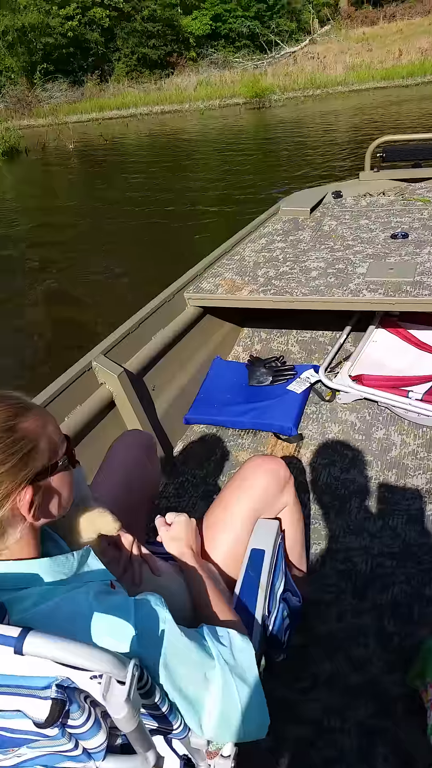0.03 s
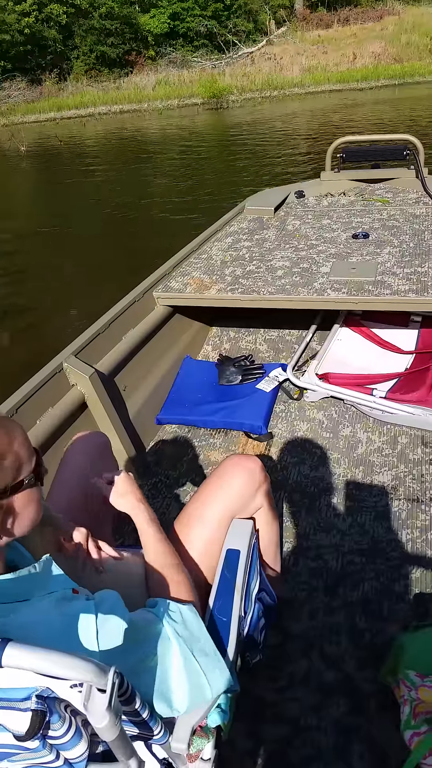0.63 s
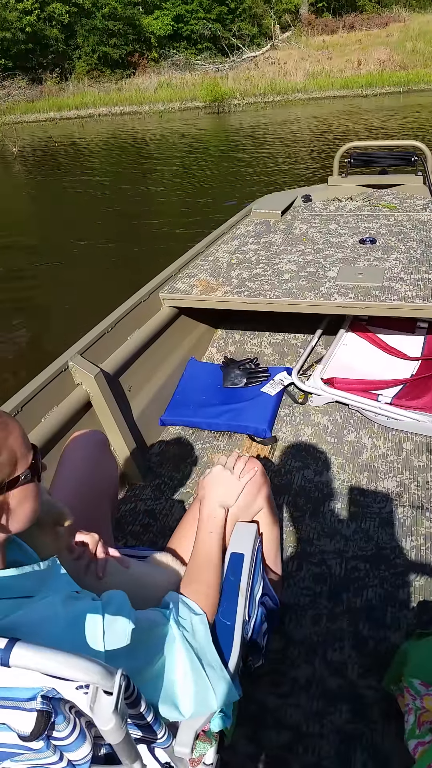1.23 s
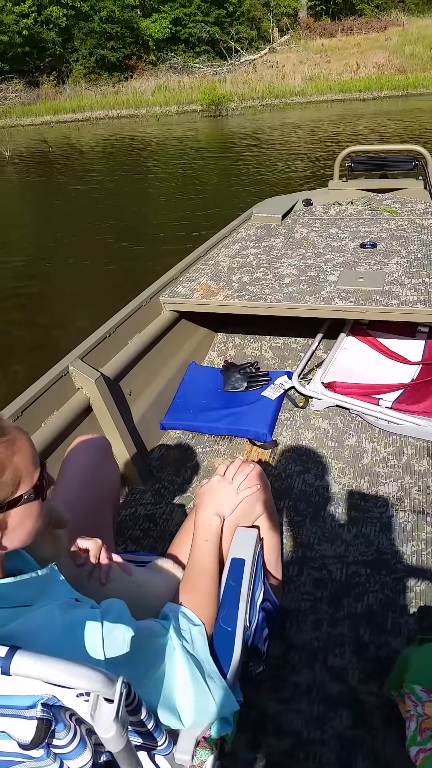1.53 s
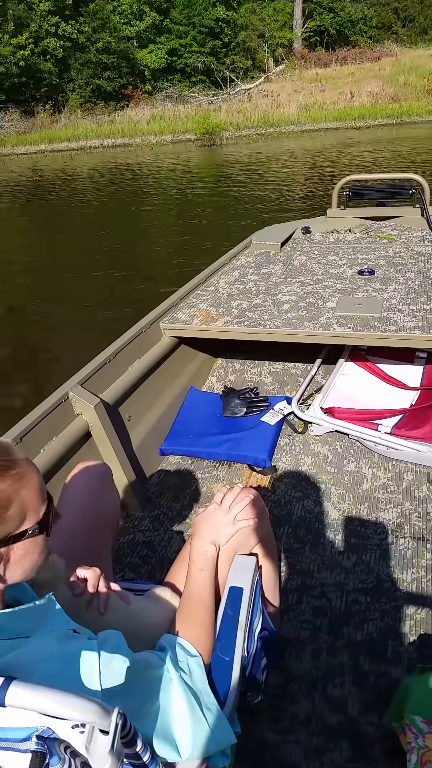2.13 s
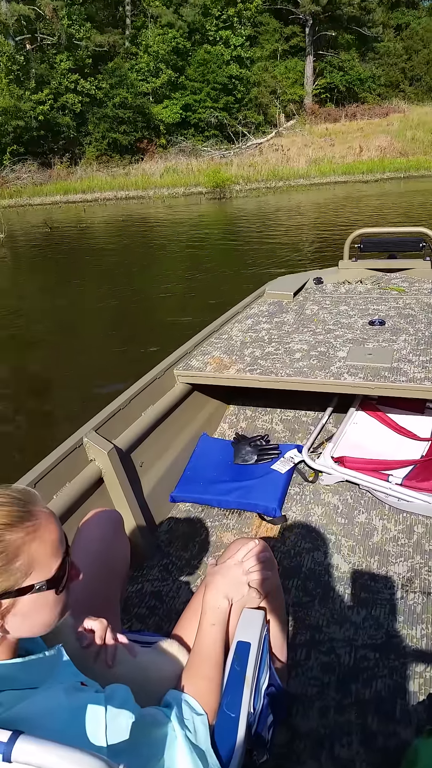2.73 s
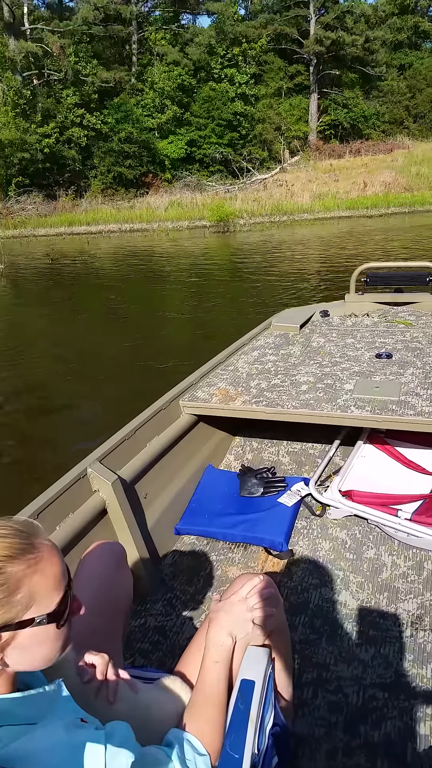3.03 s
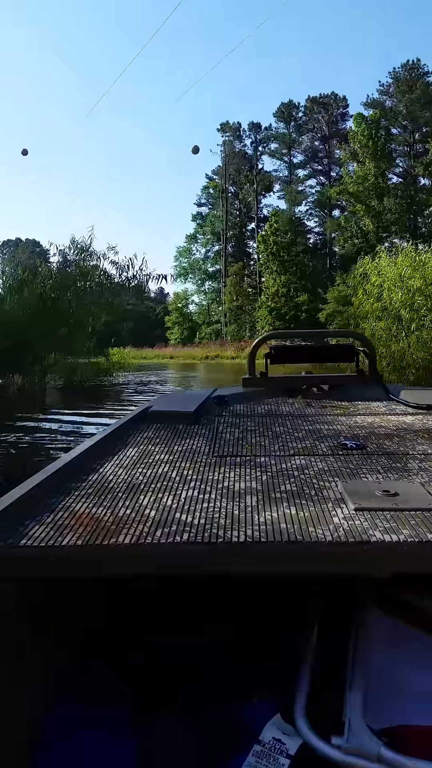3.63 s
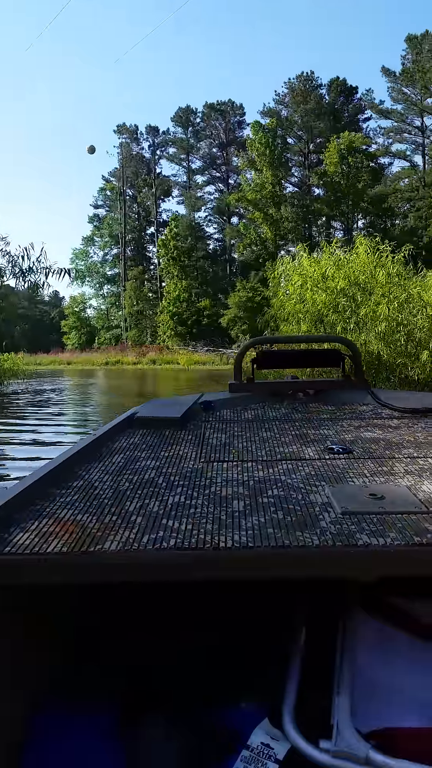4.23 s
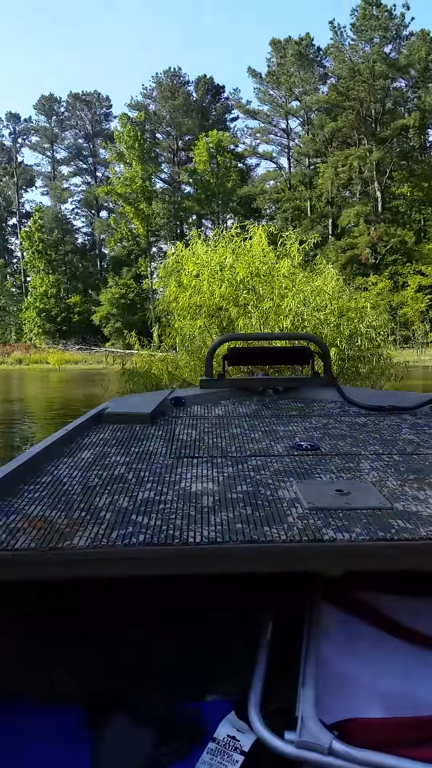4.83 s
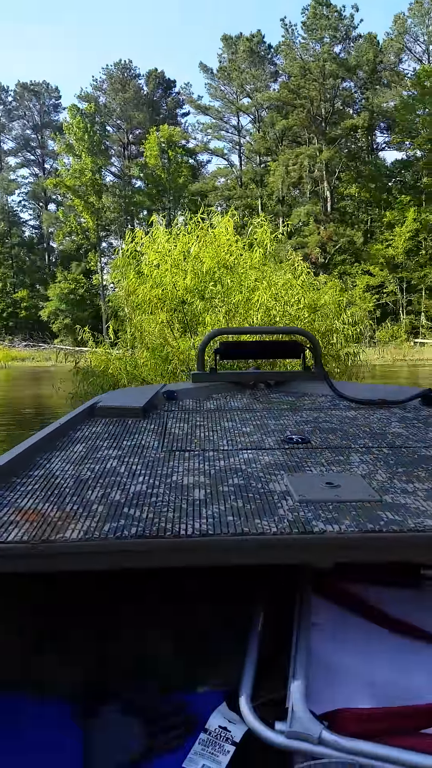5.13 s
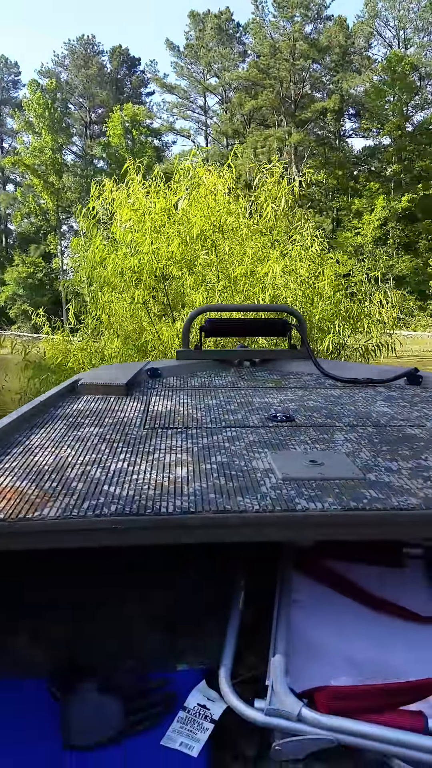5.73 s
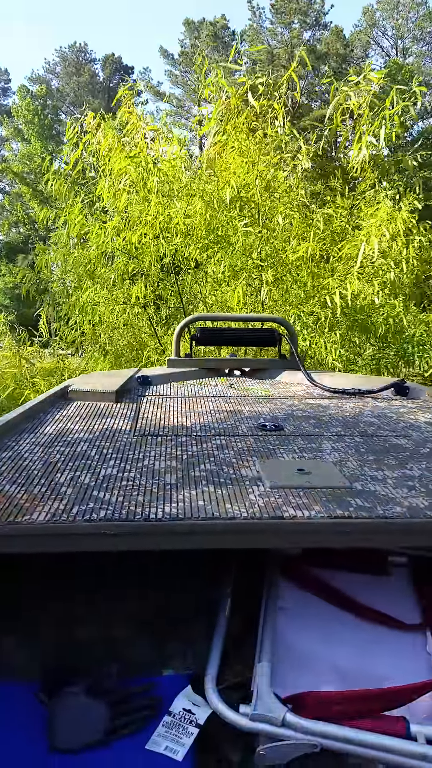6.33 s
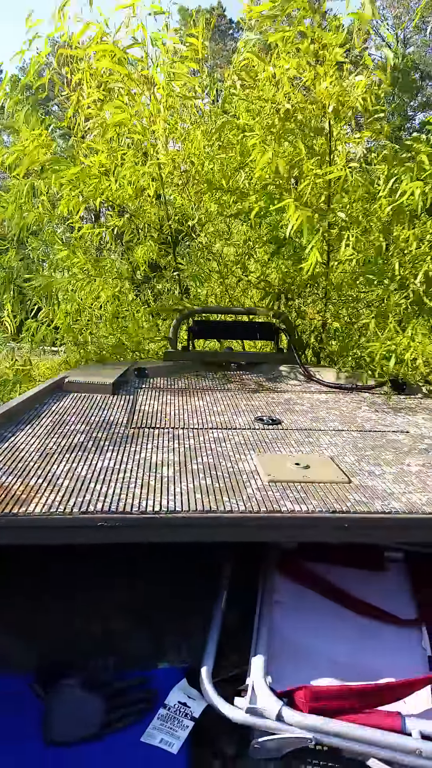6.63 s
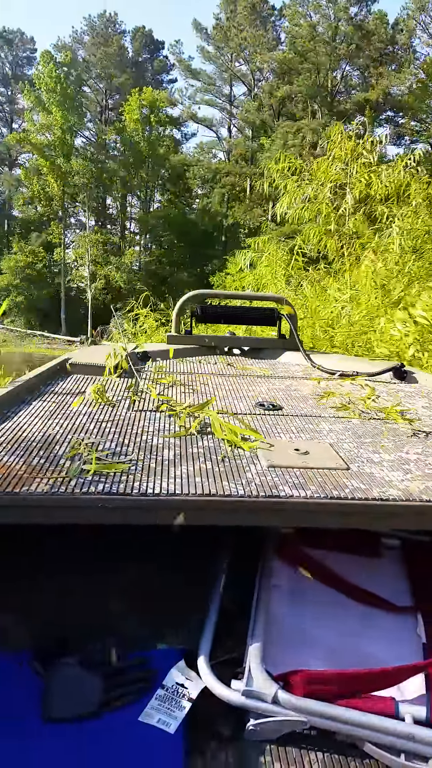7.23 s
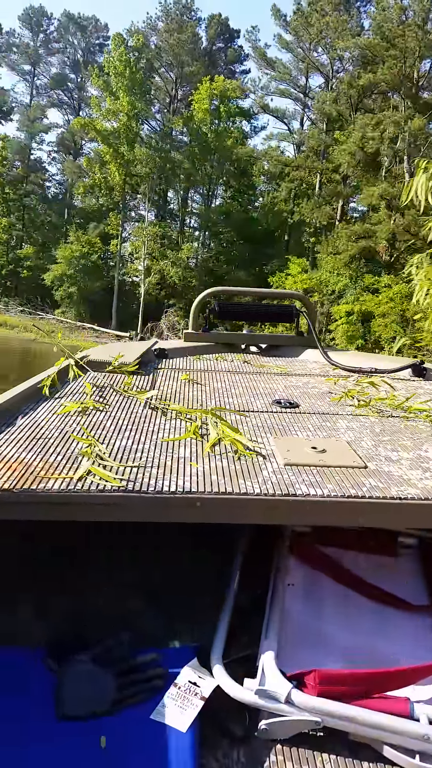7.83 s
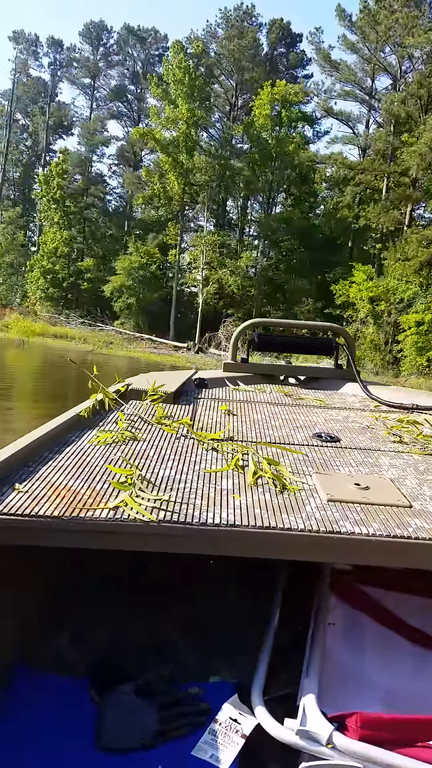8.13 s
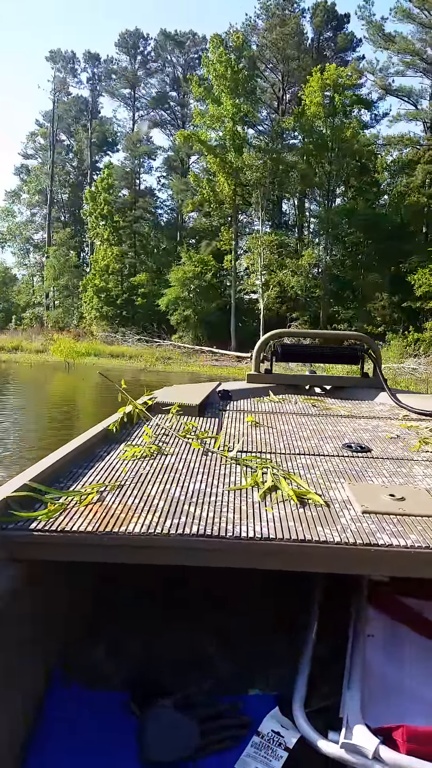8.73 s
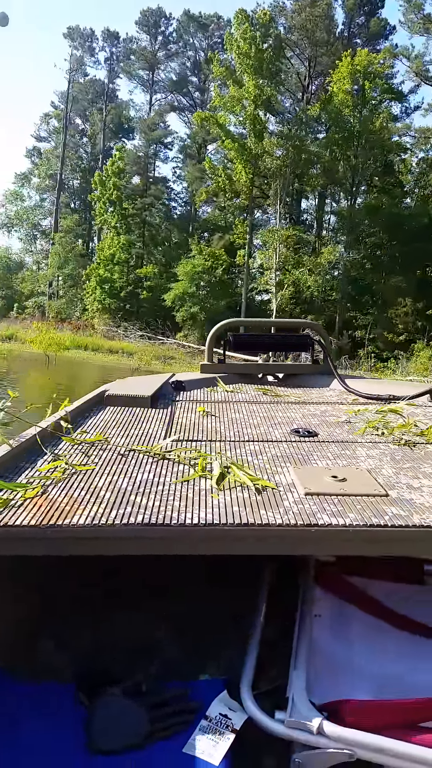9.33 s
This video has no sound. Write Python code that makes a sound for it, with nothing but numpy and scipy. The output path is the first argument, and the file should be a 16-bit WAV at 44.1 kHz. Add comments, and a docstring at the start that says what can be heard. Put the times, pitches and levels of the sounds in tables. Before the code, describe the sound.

Heard on board, a boat engine chugs unevenly, drops to idle, then climbs to full power amid wind, spray and snapping twigs.

```python
"""A V-twin mud motor chugs at a trot, heard from on board a flat metal boat on a lake.
After a click, from lower in the hull, it idles, revs up and pushes the boat through a willow bush.
Uneven pairs of firings ring the exhaust and shake the hull; valves hiss, a loose panel buzzes,
a fitting jingles, water fizzes, wind rumbles and twigs snap.
In the run, engine speed sets the motor's levels; load is (speed / full speed) squared."""
import sys
import numpy as np
from scipy import signal
from scipy.fft import rfft, irfft
from scipy.io import wavfile
from scipy.ndimage import uniform_filter1d

SR = 44100
rng = np.random.default_rng(int(sys.argv[2]) if len(sys.argv) > 2 else 0)


def unload_wav(signal):
    """Save mono or channel-first audio to the path in sys.argv[1] as 16-bit WAV at rate SR, clipped to [-1, 1]."""
    wavfile.write(
        sys.argv[1],
        SR,
        np.round(np.clip(np.atleast_2d(signal).T, -1, 1) * 32767).astype(np.int16),
    )


N = 422037
TIME_S = np.arange(N) / SR
RUN_START_S = 3.459
FULL_SPEED_HZ = 30.5  # engine speeds count four-stroke cycles


def undb(db):
    """Decibels to gain."""
    return 10 ** (np.asarray(db) / 20)


def curve(points):
    """(t/s, value) points to one value a sample."""
    return np.interp(TIME_S, *np.transpose(points))


def unit(x):
    """Scale to rms 1."""
    return x / np.sqrt(np.mean(x ** 2))


def steady(x, size=24000):
    """Even out the slow level, keeping single beats."""
    power = np.mean(np.atleast_2d(x) ** 2, axis=0)
    power = uniform_filter1d(uniform_filter1d(power, size // 2), size // 2)
    return x / np.sqrt(np.maximum(power, 0) + 1e-12)


def ring(x, response):
    """Play x through an impulse response."""
    return signal.fftconvolve(np.atleast_2d(x), np.atleast_2d(response))[:, :N]


def colour(x, points, size=16384):
    """Minimum-phase filter through (f/Hz, gain/dB) points."""
    hz, db = np.transpose(points)
    log_hz = np.log(np.fft.rfftfreq(size, 1 / SR) + 1)
    log_gain = np.log(undb(np.interp(log_hz, np.log(hz), db)))
    causal = np.r_[1, np.full(size // 2 - 1, 2), np.zeros(size // 2)]
    cepstrum = irfft(log_gain) * causal
    return ring(x, irfft(np.exp(rfft(cepstrum))))


def modes(x, rows):
    """Sum of resonances (f/Hz, width/Hz, gain/dB)."""
    return sum(undb(db) * signal.lfilter(*signal.iirpeak(hz, hz / width_hz, fs=SR), x)
               for hz, width_hz, db in rows)


def noise(alike, size=N):
    """Stereo white noise with correlation alike."""
    white = rng.standard_normal((3, size))
    return np.sqrt(alike) * white[2] + np.sqrt(1 - alike) * white[:2]


def walk(rate_hz):
    """Slow random wander of rms 1."""
    hold = int(SR / rate_hz)
    steps = np.repeat(rng.standard_normal(N // hold + 1), hold)
    return unit(uniform_filter1d(steps, hold)[:N])


def beats(cycle, strokes, scatter_db, jitter_s):
    """One pulse a cycle per stroke (phase/cycles, level/dB), each a little different."""
    out, count = np.zeros(N + 2), 400
    for phase, db in strokes:
        at = np.interp(np.arange(count) + phase, cycle, np.arange(N), left=-N, right=-N)
        timing, strength = rng.standard_normal((count, 2)).T
        at = at + jitter_s * SR * timing
        inside = (at >= 0) & (at < N)
        gain = undb(db + scatter_db * strength)[inside]
        i, fraction = at[inside].astype(int), at[inside] % 1
        out[i] += gain * (1 - fraction)
        out[i + 1] += gain * fraction
    return out[:N]


def fade(t60_s, size=16384):
    """Exponential decay."""
    return undb(-60 * np.arange(size) / SR / t60_s)


def puffs(pulses, t60_s, alike, rise_samples=150):
    """Each pulse releases a noise burst that swells and dies."""
    return uniform_filter1d(ring(pulses, fade(t60_s)), rise_samples) * noise(alike)


def stereo(x, balance, lag_samples):
    """Split each band's power by balance (f/Hz, left minus right/dB); the left side lags."""
    hz, db = np.transpose(balance)
    right_db = 10 * np.log10(2 / (1 + undb(db) ** 2))
    left = colour(np.roll(x[0], lag_samples), np.c_[hz, right_db + db])
    right = colour(x[1], np.c_[hz, right_db])
    return np.vstack([left, right])


def hull(pulses, t60_s, alike):
    """Every blow excites the same dense plate modes, so the clatter repeats with the engine."""
    tail = fade(t60_s)
    return ring(pulses, tail * noise(alike, len(tail)))


def trot():
    """Paired exhaust thuds about 270 degrees apart, weaker gulps between; valves knock and hiss."""
    # engine speed: t/s, speed/Hz
    speed_points = [(0.36, 11.594), (1.05, 11.826), (1.5, 11.632), (1.85, 11.809), (2.4, 12.264),
                    (3.46, 11.995)]
    # exhaust, clatter and valve spectra: f/Hz, level/dB
    pipe_spectrum = [(20, -74), (38, -22), (60, -3), (92, 2), (150, 7), (195, 1.5), (250, -3.5),
                     (285, -21.5), (400, -23.5), (520, -46.5), (1200, -106.5)]
    clatter_spectrum = [(100, 4), (260, -14), (380, 4), (500, -3.5), (750, 0), (1000, -4), (1550, -3.5),
                        (2100, -13), (3000, -17.5), (5000, -23), (12000, -24)]
    hiss_spectrum = [(1200, -5), (2400, -5.5), (3400, -4), (4500, 1), (5400, -9), (7500, -9), (8400, -10),
                     (9200, 3), (10000, 3), (12400, -1), (14000, -12), (15600, -23)]
    # stereo balance: f/Hz, left minus right/dB
    balance = [(100, -.5), (700, 1.5), (1300, 0), (2400, 1), (4000, 3.5), (5300, 12), (7500, 9), (8400, 0),
               (9400, -14), (12400, -14), (15000, -6)]
    start_s, swell_s = .38, .33
    cycle = np.cumsum(curve(speed_points) * (TIME_S > .36)) / SR
    firings = beats(cycle, [(.253, 0), (.632, 0)], scatter_db=.56, jitter_s=.00011)
    gulps = beats(cycle, [(.505, -11), (.882, -8.5)], scatter_db=-1.5, jitter_s=.00047)
    exhaust = unit(colour(-(firings + gulps), pipe_spectrum)) * undb(-12.5)
    valves = beats(cycle, [(.265, -13), (.6, -11), (.92, -5.5)], scatter_db=1.5, jitter_s=.000489)
    knocks = .64 * unit(hull(valves + .22 * firings, t60_s=.24, alike=.85))
    rasp = .6 * unit(puffs(valves, t60_s=.19, alike=.87)) + .7 * noise(.86)
    clatter = unit(colour(knocks + rasp, clatter_spectrum)) * undb(-28)
    air = unit(puffs(valves, t60_s=.06, alike=.05, rise_samples=240)) + .31 * noise(0)
    hiss = unit(colour(air, hiss_spectrum)) * undb(-38)
    swell = (1 - 1.075 * np.exp(-np.maximum(TIME_S - start_s, 0) / swell_s)) * (TIME_S > start_s)
    return stereo((exhaust + clatter + hiss) * swell, balance, lag_samples=14)


def click():
    """One dry click as the listening spot changes."""
    pulse = np.zeros(N)
    pulse[int(RUN_START_S * SR)] = 1
    return colour(pulse, [(100, 12), (500, 20), (1500, 11.5), (5000, 2), (15000, -15)])


def engine(cycle, speed_hz, load, overrun):
    """The pipe booms at idle and barks under load; the hull clatters and drones on a low mode."""
    # exhaust and hull spectra: f/Hz, level/dB
    boom_spectrum = [(20, -28.5), (40, -26), (62, -4.5), (80, -7.5), (100, -10.5), (118, 0), (133, 4),
                     (155, -2.5), (180, -13), (225, -13), (265, -35.5), (400, -37.5), (900, -60.5)]
    bark_spectrum = [(40, -46), (90, -22.5), (150, -17.5), (200, -2), (245, -11), (290, 4), (345, -10),
                     (420, -17.5), (520, -30), (620, -26.5), (1000, -45.5), (3000, -78)]
    idle_spectrum = [(100, -6), (280, -7.5), (400, -1.5), (570, 4), (720, -3.5), (1050, -27.5),
                     (1500, -8.5), (2000, -17.5), (3000, -17.5), (3800, -28.5), (6000, -32), (12000, -43)]
    loaded_spectrum = [(100, -9.5), (280, 6), (400, 1.5), (610, -0.5), (770, -7.5), (1100, -13.5),
                       (1500, -12), (2000, -14.5), (2500, -12.5), (3300, -32.5), (6000, -30.5),
                       (12000, -65)]
    slack = 1 - load
    racing = np.interp(speed_hz, [22, FULL_SPEED_HZ], [0, 1])  # boom and bark give way to tones
    throttle = undb(np.interp(speed_hz, [6.6, 13.7], [-13.5, 0]))  # firings hit harder as it opens
    firings = beats(cycle, [(.885, 0), (.265, 0)], scatter_db=.5, jitter_s=.00024)
    boom = unit(colour(-firings, boom_spectrum)) * undb(-14 + 4 * slack - 11.5 * racing)
    low_mode = modes(modes(firings, [(76, 7.7, 0)]), [(77.2, 43, 0)])
    drone = throttle * unit(low_mode) * undb(-22.5 + 9 * slack)
    barks = beats(cycle, [(.885, 0), (.281, -1.2)], scatter_db=2.5, jitter_s=.00031)
    bark_db = -17.5 - 8 * slack - 6.5 * racing + 4 * overrun
    bark = throttle * steady(colour(barks, bark_spectrum)) * undb(bark_db)
    strokes = [(.94, -1), (.15, -3), (.35, .5), (.55, 1.5), (.73, .8)]
    blows = beats(cycle, strokes, scatter_db=2.84, jitter_s=.00006)
    knocks = .85 * steady(hull(blows, t60_s=.22, alike=.53))
    rasp = .8 * steady(puffs(blows, t60_s=.08, alike=.77)) + .5 * noise(.34)
    idle = unit(colour(knocks + rasp, idle_spectrum))
    loaded = unit(colour(knocks + rasp, loaded_spectrum))
    fullness = np.clip(3 * load, 0, 1)  # under load the whole hull joins in
    clatter = ((1 - fullness) * idle + fullness * loaded) * undb(-20 - 13 * slack)
    return boom + drone + bark + clatter


def tones(cycle, speed_hz):
    """Shaft and pipe tones grow with speed; each swells as it crosses a higher hull mode."""
    # engine harmonics: f/cycle rate
    orders = [2, 3, 5, 6, 7, 8, 10, 12, 14, 16, 17, 19, 20, 22, 24, 32, 36, 40, 44]
    # their strengths: level/dB
    levels_db = [3.5, -14, -6.5, -4, -6.5, -8, -5, -14.5, -22, -37, -14, -19.5, -15, -19, -20.5, -21.5,
                 -20.5, -21.5, -31]
    mode_hz, half_width_hz, peak_db = 198.4, 7.4, 10.5
    full_speed_db, db_per_octave = -17, 27.5
    chord = 0
    for order, db in zip(orders, levels_db):
        lift_db = peak_db / (1 + ((order * speed_hz - mode_hz) / half_width_hz) ** 2)
        tone = np.sin(2 * np.pi * order * (cycle + order / 7))
        chord = chord + tone * undb(db + lift_db + 1.5 * walk(4))
    return chord * undb(full_speed_db + db_per_octave * np.log2(speed_hz / FULL_SPEED_HZ))


def panel(cycle, speed_hz):
    """A loose panel slaps twice a cycle, at times hard; it dies away as the bow meets the bush."""
    # extra single slaps, some much harder than the regular ones: t/s, level re a regular slap/dB
    extra_slaps = [(3.685, 19), (4.344, 7.5), (4.44, 3), (5.004, -1), (5.076, -2), (5.482, 3)]
    # soft contact spectrum: f/Hz, level/dB
    contact = [(2400, 0), (3400, -10), (6000, -16)]
    # panel modes before and after the rev-up: f/Hz, width/Hz, level/dB
    slow_modes = [(564, 61, -14), (1442, 44, 6), (1640, 59, -11), (2140, 37, -4.5)]
    fast_modes = [(1257, 40, 1.5), (1660, 57, 8.5), (2070, 76, 4.5), (2350, 59, -20)]
    full_shake_hz, db_per_octave = 14.8, 10.5
    fade_start_s, fade_db_per_s = 6.13, 45
    hits = beats(cycle, [(.36, -1.4), (.73, .79)], scatter_db=1.8, jitter_s=.002)
    for at_s, db in extra_slaps:
        hits[int(at_s * SR)] += undb(db)
    slaps = colour(puffs(hits, t60_s=.04, alike=.25), contact)
    fast = curve([(4.6, 0), (4.9, .98)])
    buzz = (1 - fast) * steady(modes(slaps, slow_modes)) + fast * steady(modes(slaps, fast_modes))
    shake_db = db_per_octave * np.minimum(np.log2(speed_hz / full_shake_hz), 0)
    fade_db = fade_db_per_s * np.maximum(TIME_S - fade_start_s, 0)
    return buzz * undb(-34 + shake_db - fade_db)


def jingle(cycle, speed_hz):
    """A small fitting shakes most near one low engine speed; its modes waver in strength."""
    # its modes: f/Hz, width/Hz, level/dB
    metal_modes = [(6900, 370, -7), (7830, 250, 0), (8580, 530, 2.5), (9700, 400, 2), (10000, 310, -1),
                   (11900, 910, 5), (12900, 340, -22)]
    resonant_hz, width_hz, lift_db = 12.4, 3.1, 7
    jolts = beats(cycle, [(.25, 0), (.86, -3), (.58, -7)], scatter_db=2.5, jitter_s=.001)
    shakes = puffs(jolts, t60_s=.12, alike=.05, rise_samples=300)
    ringing = steady(sum(modes(shakes, [mode]) * undb(4.5 * walk(25)) for mode in metal_modes))
    in_tune = np.exp(-((speed_hz - resonant_hz) / width_hz) ** 2)
    return ringing * undb(-48 + lift_db * in_tune) * np.minimum(resonant_hz / speed_hz, 1)


def spray(load):
    """The wash fizzes louder with load; willow leaves swell it as they brush along the boat."""
    # fizz spectrum: f/Hz, level/dB
    spectrum = [(1500, -24), (3000, 5.5), (4000, 0), (5500, -1), (7000, 2), (8300, -1), (9200, 1.5),
                (12500, 0.5), (14000, -6), (15600, -9.5)]
    leaves_s, attack_s, hold_s, release_s = 6.13, 1.92, .81, .33
    drops = rng.standard_normal((2, N)) * (rng.random((2, N)) < .03)
    drops *= undb(.88 * np.minimum(rng.exponential(size=(2, N)), 6))
    fizz = unit(colour(noise(.027) + .6 * unit(drops), spectrum)) * undb(1.06 * walk(25))
    brushing = np.interp(TIME_S, leaves_s + np.cumsum([0, attack_s, hold_s, release_s]), [0, 1, 1, 0])
    wash_db = -36 - 10 * (1 - load)
    return fizz * np.hypot(undb(wash_db), brushing * undb(-39))


def wind():
    """Air and churned water rumble, louder as the boat gathers way."""
    # rumble spectrum: f/Hz, level/dB
    spectrum = [(20, -25), (50, -11.5), (90, -3), (200, -3.5), (320, -14), (450, -28.5), (1000, -24),
                (3000, -56)]
    rush_db = curve([(6.2, -24.5), (8, -17)])
    return unit(colour(noise(.8), spectrum)) * undb(rush_db + 2.6 * walk(11))


def twigs():
    """Willow twigs snap against the bow and tick on the deck."""
    # twig strikes: t/s, level/dB, f/Hz, width/Hz, t60/s
    strikes = [(6.763, -29.5, 2860, 900, 0.059), (6.771, -28.5, 1750, 1490, 0.071),
               (6.836, -43, 2000, 2000, 0.054), (6.949, -33, 2200, 2000, 0.059),
               (6.994, -26, 11000, 9000, .04), (7.75, -26, 11000, 6000, .025),
               (8.037, -22, 10500, 4000, .015), (8.079, -29, 9000, 200, .09),
               (8.145, -25, 12000, 6000, 0.054), (8.57, -29, 10000, 8000, .05)]
    out = np.zeros((2, N))
    for at_s, db, hz, width_hz, t60_s in strikes:
        tail, i = fade(t60_s), int(at_s * SR)
        snap = unit(modes(noise(.83, len(tail)), [(hz, width_hz, 0)]))
        out[:, i:i + len(tail)] += undb(db) * tail * snap
    return out


def run():
    """Slow idle, a first push of throttle, a short easing, then full power."""
    # engine speed: t/s, speed/Hz
    speed_points = [(3.46, 7.251), (4.2, 7.43), (4.45, 10.806), (4.75, 12.571), (5.05, 14.316),
                    (5.35, 16.804), (5.65, 20.969), (5.9, 23.068), (6.1, 23.869), (6.4, 21.993),
                    (6.72, 20.533), (6.9, 21.661), (7.15, 25.021), (7.5, 27.671), (8.25, 30.707),
                    (8.8, 30.494), (9.1, 29.932), (9.57, 29.986)]
    # stereo balance: f/Hz, left minus right/dB
    balance = [(150, -1), (350, 0), (700, 2), (1400, 3.5), (2700, 1), (4000, 9), (5500, 16), (7500, 12),
               (8500, 0), (9300, -7), (12400, -9), (14500, 0)]
    full_overrun_hz_per_s = 6.3
    sink_start_s, sink_db_per_s = 8.83, 3
    speed_hz = curve(speed_points)
    cycle = np.cumsum(speed_hz) / SR
    cycle -= cycle[int(RUN_START_S * SR)] % 1
    load = (speed_hz / FULL_SPEED_HZ) ** 2
    # off throttle the pipe barks louder and the wash drops
    fall_hz_per_s = -np.gradient(speed_hz) * SR
    overrun = uniform_filter1d(np.clip(fall_hz_per_s / full_overrun_hz_per_s, 0, 1), size=12000)
    motor = engine(cycle, speed_hz, load, overrun) + tones(cycle, speed_hz)
    rattles = panel(cycle, speed_hz) + jingle(cycle, speed_hz)
    wash = spray(load) * undb(-2 * overrun)
    sink = undb(-sink_db_per_s * np.maximum(TIME_S - sink_start_s, 0))
    return stereo(sink * (motor + rattles + wash) + wind() + twigs(), balance, lag_samples=2)


def scene():
    """Silence, the trot, then an abrupt change to the run."""
    return np.where(TIME_S < RUN_START_S, trot(), run()) + click()


def record(dry):
    """Round the highest peaks and cut the top treble."""
    ceiling, top_hz = .95, 15800
    rounded = dry / (1 + (np.abs(dry) / ceiling) ** 6) ** (1 / 6)
    return signal.sosfilt(signal.ellip(10, .2, 80, top_hz, fs=SR, output="sos"), rounded)


dry = scene()
out = record(dry)
unload_wav(out)
```